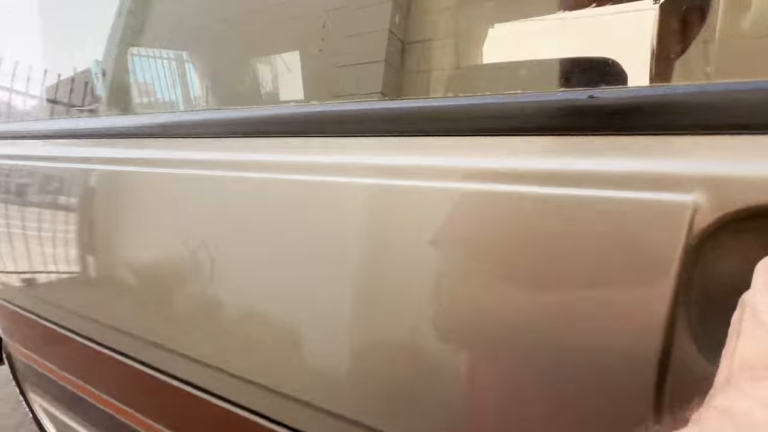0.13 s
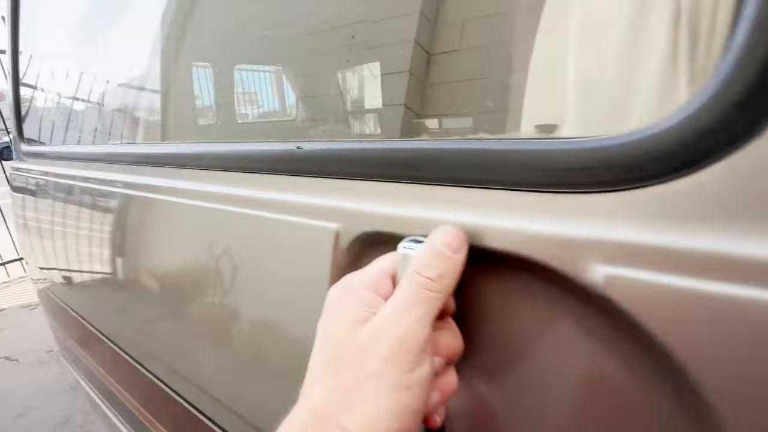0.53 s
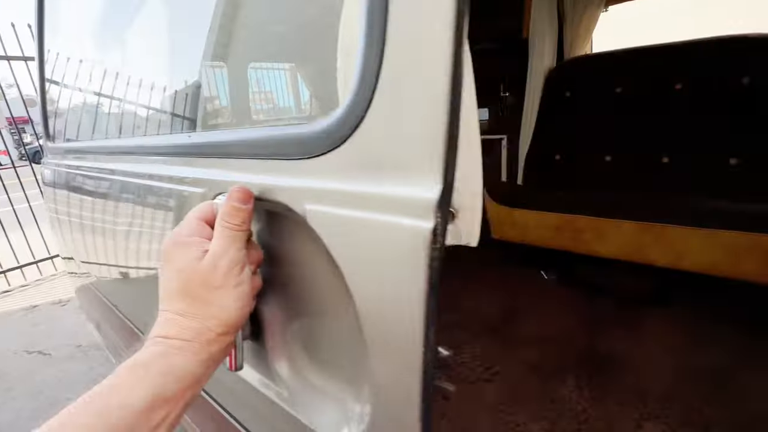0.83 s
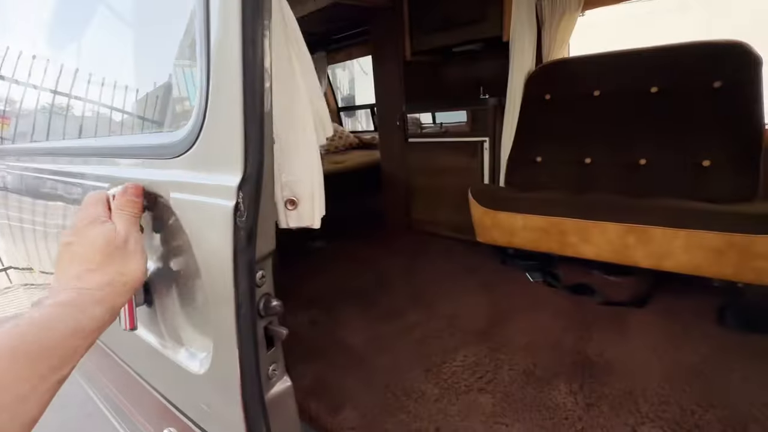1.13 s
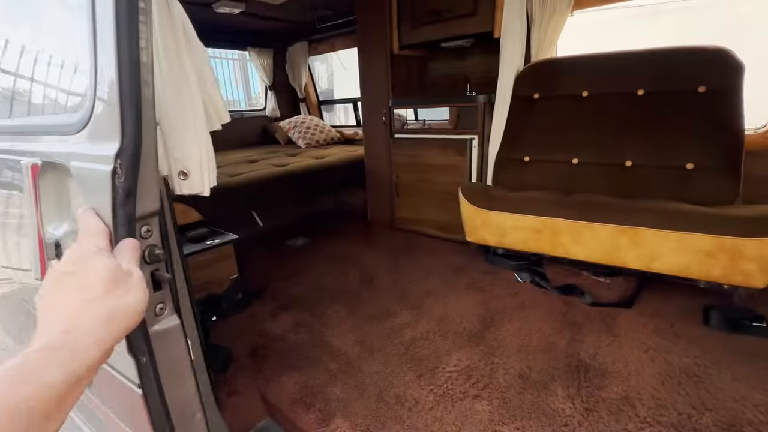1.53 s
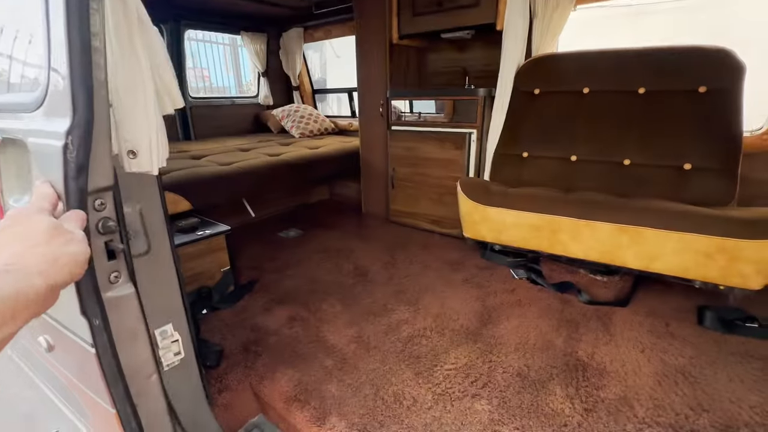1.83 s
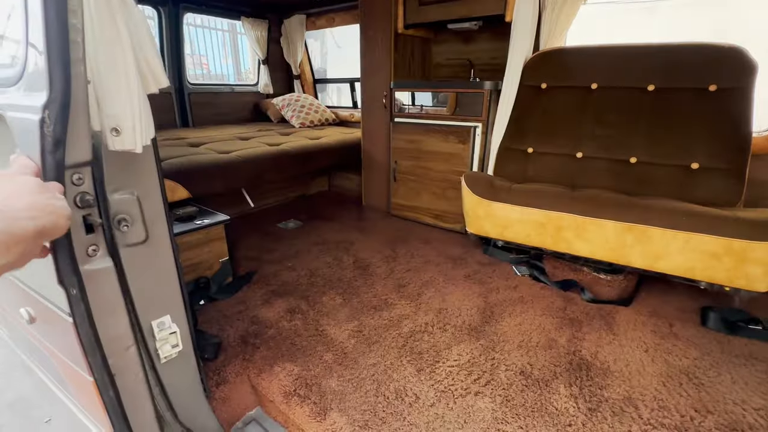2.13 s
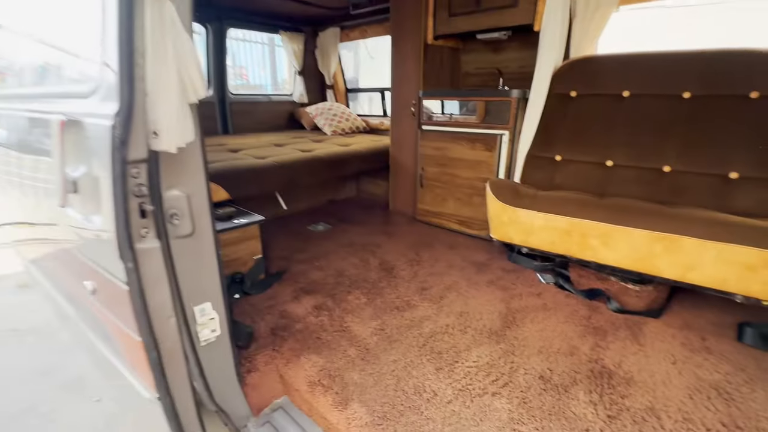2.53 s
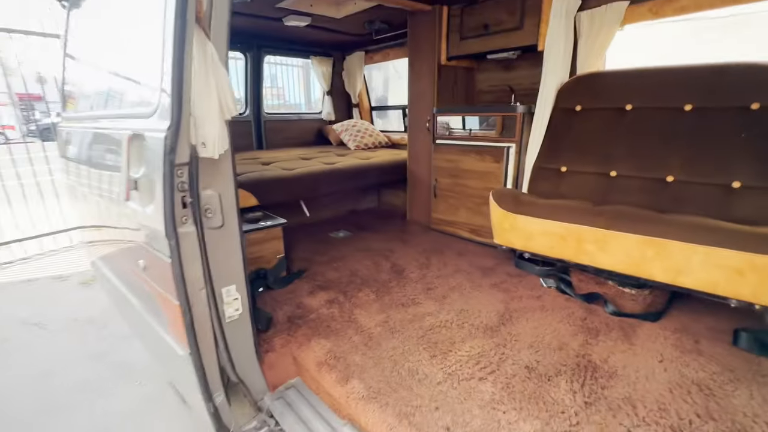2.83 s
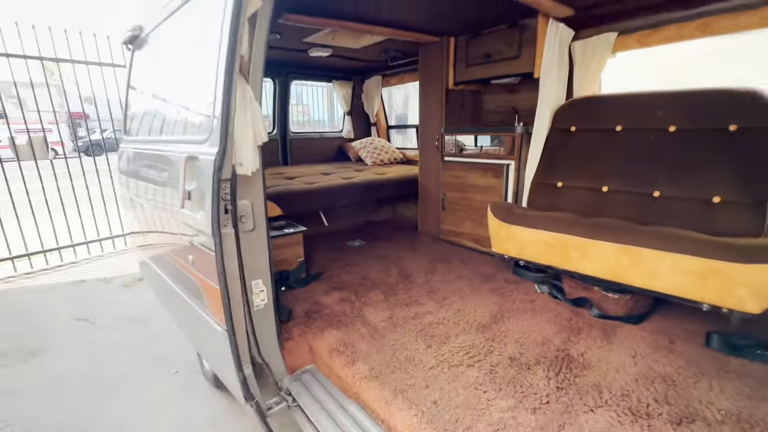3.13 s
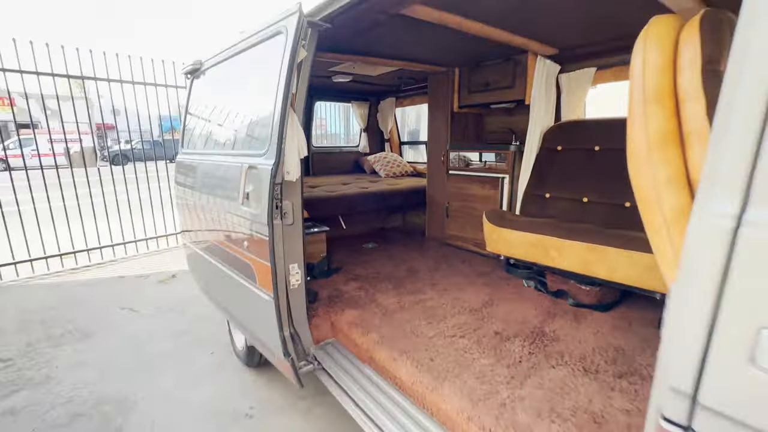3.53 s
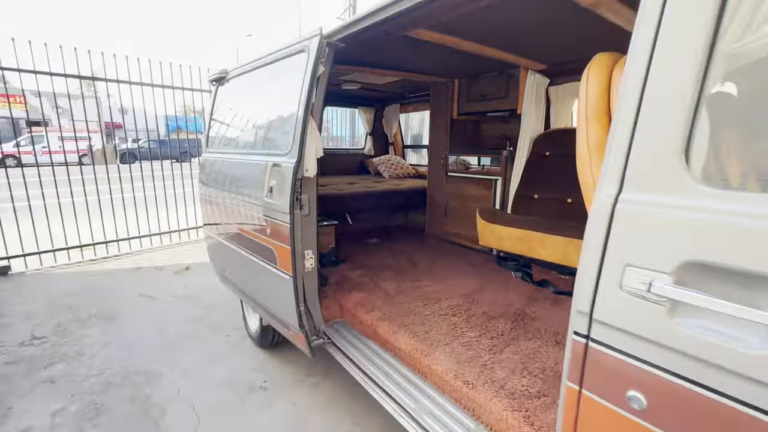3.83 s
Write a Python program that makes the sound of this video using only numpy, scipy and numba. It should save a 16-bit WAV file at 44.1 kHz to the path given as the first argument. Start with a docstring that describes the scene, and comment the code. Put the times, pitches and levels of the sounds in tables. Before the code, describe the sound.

A van's heavy sliding door clunks off its latch, rumbles along a gritty metal track with knocks and scrapes, then settles with a thin ring. Shoes and clothes scuff faintly afterwards, heard close by outdoors over distant traffic.

```python
"""A van's heavy side door clunks off its latch, rolls back along its metal track and slows to a stop.
Bumps under the rollers drum the door panel, brighter with speed; grit crunches, the rollers knock and
scrape, the latch rattles, and a thin metal ring lingers as the door settles.
Then shoes and clothes scuff as someone steps back. Dry ticks and distant traffic run through it all."""
import sys
import numpy as np
from scipy import signal
from scipy.fft import rfft, irfft
from scipy.io import wavfile
from scipy.ndimage import map_coordinates
from numba import njit

SR = 44100
rng = np.random.default_rng(int(sys.argv[2]) if len(sys.argv) > 2 else 0)


def unload_wav(signal):
    """Save mono or channel-first audio to the path in sys.argv[1] as 16-bit WAV at rate SR, clipped to [-1, 1]."""
    wavfile.write(
        sys.argv[1],
        SR,
        np.round(np.clip(np.atleast_2d(signal).T, -1, 1) * 32767).astype(np.int16),
    )


N = 176400
T = np.arange(N) / SR
F = np.maximum(np.arange(N + 1) * SR / (2 * N), 1)
MIC_LAG_S = 0.000467  # left microphone to right
GRIT_PER_S = 900


def undb(db):
    """Decibels to gain."""
    return 10 ** (np.asarray(db) / 20)


def unit(x):
    """Scale to rms 1."""
    return x / np.sqrt(np.mean(x ** 2))


def curve(rows, column=1):
    """One column of a table, joined by lines in time."""
    rows = np.array(rows)
    return np.interp(T, rows[:, 0], rows[:, column])


def over_hz(rows):
    """Points joined on a log-frequency axis."""
    rows = np.array(rows)
    return np.interp(np.log(F), np.log(rows[:, 0]), rows[:, 1])


def colour(rows):
    """Minimum-phase EQ through (freq_hz, gain_db) points."""
    cepstrum = irfft(np.log(undb(over_hz(rows))))
    cepstrum[1:N] *= 2
    cepstrum[N + 1:] = 0
    return np.exp(rfft(cepstrum))


def resonance(hz, width):
    """Response of one mode, gain 1 at its centre."""
    return 1 / (1 + 1j * (F / hz - hz / F) * hz / width)


def through(x, response):
    """Filter a sound."""
    return irfft(rfft(x, 2 * N) * response)[..., :N]


def walk(rate):
    """Smooth random drift, spread about 1, with `rate` new values a second."""
    return map_coordinates(rng.standard_normal(2048), [T * rate], order=3, mode='wrap')


def swell(peak_s, half_length_s):
    """Bell-shaped fade in and out."""
    return np.exp(-((T - peak_s) / half_length_s) ** 2 / 2)


def grains(per_s, spread_db):
    """Three unrelated streams of tiny impacts of uneven size."""
    hit = rng.random((3, N)) < per_s / SR
    size = undb(spread_db * np.minimum(rng.exponential(size=(3, N)), 4))
    return unit(hit * size * np.sign(rng.standard_normal((3, N))))


def stereo(x, response, lag_s=0.):
    """Filter three streams into stereo: one shared, lag_s later on the right, and one for each side."""
    # how alike the two microphones sound: freq_hz, shared_fraction
    likeness = [(60, 0.96), (180, 0.88), (360, 0.76), (600, 0.4), (1100, 0.37), (1900, 0.38), (5000, 0.03),
                (15000, 0.33)]
    share = over_hz(likeness)
    spectra = rfft(x, 2 * N) * response
    shared = spectra[0] * np.exp(-2j * np.pi * F * lag_s * np.array([[0], [1]]))
    return irfft(np.sqrt(share) * shared + np.sqrt(1 - share) * spectra[1:])[:, :N]


def ring_out(x, t60_s, wet):
    """Add a short, dense ring like that of sheet metal."""
    tail = rng.standard_normal((3, SR // 2)) * undb(-60 * T[:SR // 2] / t60_s)
    tail /= np.sqrt(np.sum(tail ** 2, axis=1, keepdims=True))
    return (x + wet * signal.fftconvolve(x, tail, axes=1)[:, :N]) / np.hypot(1, wet)


@njit
def lowpass(x, hz, damping):
    """Two-pole low-pass with a hump at its moving corner; less damping, more hump."""
    y, band_state, low_state = np.empty(len(x)), 0., 0.
    for i in range(len(x)):
        g = np.tan(np.pi * hz[i] / SR)
        band = (band_state + g * (x[i] - low_state)) / (1 + g * (g + damping))
        y[i] = low_state + g * band
        band_state, low_state = 2 * band - band_state, 2 * y[i] - low_state
    return y


def strikes(rows, vary_db, fittings=1):
    """Each blow is a quick chatter of contacts that rings steel and any fittings; vary_db recolours it."""
    # tone of struck steel: freq_hz, gain_db
    steel_eq = [(100, -13.5), (400, 0), (900, 11), (2000, 5), (3200, -4), (5000, -7), (7000, -17.5),
                (11000, -34), (16000, -46)]
    chatter = ring_out(grains(per_s=700, spread_db=1.1), t60_s=0.039, wet=3.0)
    size = 8192
    octaves = np.log2(np.clip(np.arange(size // 2 + 1) * SR / size, 500, 12000) / 1500)
    fade = 1 - T[:size] / T[size]
    force = np.zeros((3, N))
    for start_s, db, tilt, chatter_s in rows:
        i = int(start_s * SR)
        burst = chatter[:, i:i + size] * np.exp(-T[:size] / chatter_s)
        burst *= np.sqrt(chatter_s * SR / 2 / np.sum(burst ** 2, axis=1, keepdims=True))
        ripple = np.interp(octaves, np.arange(-12, 24) / 6, rng.standard_normal(36))
        tone = undb(tilt * octaves + vary_db * ripple)
        force[:, i:i + size] += undb(db) * irfft(rfft(burst) * tone) * fade
    body = colour(steel_eq) * fittings
    body /= np.sqrt(np.mean(abs(body) ** 2))
    return stereo(ring_out(force, t60_s=0.068, wet=0.63), body, MIC_LAG_S) * undb(3.5)


def swing_out(hold_s=0.032, deep_fall_s=0.25, panel_fall_s=0.057):
    """The door's mass shudders as it swings clear of its seal."""
    shake = rng.standard_normal((3, N))
    fading_s = np.maximum(T - hold_s, 0)
    deep = unit(stereo(shake, resonance(hz=48, width=45) ** 2)) * np.exp(-fading_s / deep_fall_s)
    panel = unit(stereo(shake, resonance(hz=132, width=117) ** 2)) * np.exp(-fading_s / panel_fall_s)
    return undb(-21) * (deep + undb(-1) * panel)


def rolling(full_speed_hz=619, jolt_fall_s=0.038, shift_db=5, lag_s=0.00014, drift_s_per_s=0.00012):
    """Bumps in the track shake the panel; the faster the door, the sharper the bumps."""
    # the door's run: time_s, fraction_of_full_speed, roller_load_db
    travel = [(0, 0.21, 7.5), (.2, 0.38, 3), (.29, 0.41, -2), (.33, 0.53, -1.5), (.52, 0.61, -1.5),
              (.76, 0.68, -2.5), (1.08, 0.89, -3.5), (1.4, 0.81, -6.5), (1.74, 0.76, -4), (1.82, 0.78, -10),
              (2.02, 0.7, -12.5), (2.13, 0.51, -14), (2.31, 0.75, -19), (2.42, 0.26, -21.5),
              (2.75, 0.12, -43)]
    # extra force as the rollers drop over a bump: start_s, boost_db
    jolts = [(0.309, 6.5), (1.237, 3.5), (1.539, 7.5), (2.012, 5.5), (2.319, 2.5)]
    # tone of the door body: freq_hz, gain_db
    body_eq = [(25, -34), (55, -15.5), (85, -2), (150, 1), (280, -3.5), (450, -2.5), (510, -2.5),
               (570, 1.5), (800, 1.5), (1050, -4), (1500, -2.5), (3000, -10), (8000, -38)]
    # door panel modes: pitch_hz, width_hz, gain_db
    panel_modes = [(121.7, 23.5, -3), (207, 21, -5.5), (241.3, 21, -6.5), (322, 28, -1.5), (394, 120, -1.5),
                   (588, 16, -6.5), (705, 27, -4), (867, 35, 0)]
    corner_hz = full_speed_hz * curve(travel)
    jolt_db = sum(db * (T >= s) * np.exp(-abs(T - s) / jolt_fall_s) for s, db in jolts)
    load = undb(curve(travel, column=2) + jolt_db)
    bumps = ring_out(grains(per_s=1400, spread_db=1.93), t60_s=0.06, wet=0.32)
    force = np.array([lowpass(stream, corner_hz, damping=1.) for stream in bumps]) * load
    push = stereo(force, colour(body_eq))
    panel = undb(-1.5) * push
    for hz, width, db in panel_modes:  # each mode swells and fades as the rollers move along
        panel += through(push * undb(db + shift_db * walk(6.76)), resonance(hz, width))
    # the door passes right to left: the left side hears it late at first, then early
    left = map_coordinates(panel[0], [(T - lag_s + drift_s_per_s * T) * SR], order=3, mode='nearest')
    return undb(-21) * unit(np.array([left, panel[1]]))


def grit():
    """Fine crunch of the rollers on the steel track, fading as the door runs on."""
    # grit under the rollers: time_s, level_db
    levels = [(0, -23.5), (.25, -27.5), (.4, -32), (.7, -32), (1.18, -29), (1.46, -32), (1.74, -35),
              (1.8, -43.5), (2.05, -46.5), (2.35, -48.5), (2.6, -88)]
    # tone of the steel track: freq_hz, gain_db
    track_eq = [(200, -61.5), (700, 10), (1300, 7.5), (2000, -5), (3000, -8.5), (4600, -15.5),
                (6500, -20.5), (10000, -26.5), (16000, -40.5)]
    crunch = ring_out(grains(GRIT_PER_S, spread_db=2.6), t60_s=0.061, wet=1.6)
    return unit(stereo(crunch, colour(track_eq), MIC_LAG_S)) * undb(curve(levels) + walk(25.18))


def outdoors():
    """A bed of distant traffic and a faint high hiss."""
    # traffic rumble: freq_hz, gain_db
    traffic_eq = [(20, -9), (60, 3), (85, 3.5), (130, -3.5), (250, -7), (500, -10.5), (650, -7), (950, -7),
                  (1800, -21), (2600, -29.5), (16000, -65.5)]
    # tone of the hiss: freq_hz, gain_db
    hiss_eq = [(1500, -8), (3500, 4.5), (6000, 8), (9500, 6), (12000, -0.5), (16000, -11)]
    # rise and fall of the hiss: time_s, level_db
    hiss_levels = [(0, -93), (1.8, -61.5), (2.6, -65), (2.85, -60.5), (3.15, -62), (3.33, -77), (3.48, -66),
                   (3.75, -61.5), (4, -59.5)]
    traffic = unit(stereo(rng.standard_normal((3, N)), colour(traffic_eq), lag_s=0.00043))
    hiss = unit(stereo(rng.standard_normal((3, N)), colour(hiss_eq), MIC_LAG_S))
    return traffic * undb(-40) + hiss * undb(curve(hiss_levels))


def latch():
    """The latch lets go and rattles, ringing with its own modes."""
    # latch clacks: start_s, level_db, tilt_db_per_octave, chatter_s
    clacks = [(0.042, -34.5, 11.5, 0.012), (.051, -17.5, 4.5, 0.0063), (0.062, -14.5, -3, 0.0087),
              (.068, -30, 12, 0.0035), (0.13, -20.5, 0.5, 0.012), (.293, -33, 2, 0.0073)]
    # latch modes: pitch_hz, width_hz, gain_db
    latch_modes = [(710, 16, 15.5), (1246, 120, 11), (1980, 240, -2.5), (2540, 25, 0), (4300, 1700, -1.5)]
    ringing = sum(undb(db) * resonance(hz, width) for hz, width, db in latch_modes)
    return strikes(clacks, vary_db=0, fittings=1 + ringing)


def panel_hum(waver_hz=6, flutter_db=3.5):
    """At some places along the track a low mode of the panel swells into a hum."""
    # panel hums: peak_s, pitch_hz, level_db, half_length_s
    hums = [(0.2, 205, -19, 0.06), (0.365, 210, -16, 0.031), (0.45, 300, -15, 0.018),
            (0.603, 200, -21, 0.087), (1.087, 207, -23.5, 0.031), (1.258, 555, -23.5, 0.014),
            (1.637, 565, -29, 0.049), (2.177, 125.2, -32.5, 0.21)]
    out = 0
    for peak_s, hz, db, half_length_s in hums:
        tone = np.sin(2 * np.pi * np.cumsum(hz + waver_hz * walk(24.65)) / SR)
        out += tone * undb(db + flutter_db * walk(12)) * swell(peak_s, half_length_s)
    return out


def roller_knocks():
    """The rollers strike a different spot of the track each time, so each knock has its own colour."""
    # roller blows: start_s, level_db, tilt_db_per_octave, chatter_s
    knocks = [(0.205, -30.5, 0, 0.015), (0.308, -27, -10, 0.0078), (0.611, -33, 2.5, 0.032),
              (.897, -41.5, 10, 0.0023), (.978, -19, -2, 0.0019), (1.092, -25.5, -5, 0.014),
              (1.233, -36.5, 1, 0.045), (1.364, -27.5, -4, 0.013), (1.538, -33, 0, 0.022),
              (1.692, -28.5, -2.5, 0.025), (2.011, -33.5, -4, 0.0096)]
    return strikes(knocks, vary_db=6)


def ticks(fall_s=0.0035):
    """Short dry ticks, each a burst of noise around its own pitch."""
    # small ticks: start_s, level_db, pitch_hz, width_hz
    hits = [(.212, -42, 13100, 6000), (.278, -41, 8900, 5650), (2.536, -43, 2600, 200),
            (3.085, -41.5, 3300, 1960), (3.135, -42.5, 3800, 2200), (3.428, -52, 13400, 4000),
            (3.615, -43.5, 4870, 6100), (3.766, -42.5, 3200, 1600), (3.847, -35.5, 12200, 3500),
            (3.97, -39.5, 5000, 6000)]
    out, size = np.zeros((3, N + SR)), 2048
    freqs = np.maximum(np.arange(size // 2 + 1) * SR / size, 1)
    for start_s, db, hz, width in hits:
        band = 1 / (1 + ((freqs - hz) * 2 / width) ** 2)
        burst = unit(irfft(rfft(rng.standard_normal((3, size))) * band))
        i = int(start_s * SR)
        out[:, i:i + size] += undb(db) * burst * np.exp(-T[:size] / fall_s)
    return stereo(ring_out(out[:, :N], t60_s=0.089, wet=0.45), response=1)


def scrapes():
    """A roller slips on the rail and rings its bracket."""
    # roller slips: peak_s, level_db, half_length_s
    slips = [(0.47, -37, 0.031), (0.625, -30.5, 0.017), (0.91, -40.5, 0.17)]
    # bracket modes: pitch_hz, width_hz, gain_db
    bracket_modes = [(2314, 860, 10), (4460, 450, -3)]
    envelope = sum(undb(db) * swell(peak_s, half_length_s) for peak_s, db, half_length_s in slips)
    bracket = sum(undb(db) * resonance(hz, width) ** 2.03 for hz, width, db in bracket_modes)
    return unit(stereo(grains(GRIT_PER_S, spread_db=1.8), bracket, MIC_LAG_S)) * envelope


def thin_ring(slide_hz=220, slide_s=0.02827, waver_hz=6.72, lag_s=0.00042):
    """Two close metal tones and a rough band slide up into pitch as the door slows, then die away."""
    # ringing metal: pitch_hz, width_hz, gain_db
    partials = [(1676, 9.95, 5.5), (1756, 7.4, 8.5), (1665, 69.4, 4.5)]
    # envelope of the ring: time_s, level_db
    levels = [(1.92, -52), (1.99, -28.5), (2.05, -42), (2.3, -43), (2.45, -48), (2.7, -54), (3.1, -68)]
    flat_hz = slide_hz * np.exp(-np.maximum(T - levels[0][0], 0) / slide_s)
    ring = 0
    for hz, width, db in partials:
        pitch_hz = hz - flat_hz + waver_hz * walk(14) + width * walk(90)
        tone = np.sin(2 * np.pi * np.cumsum(pitch_hz) / SR)
        rub = unit(through(rng.standard_normal(N), resonance(hz, 4 * width) ** 2))
        ring += undb(db) * (tone + rub)
    ring = unit(ring) * undb(curve(levels))
    return np.array([ring, np.interp(T - lag_s, T, ring)])


def scuffs(flutter_db=3.0, vary_db=0.5):
    """Gritty, uneven swishes of shoes and clothes, each with its own small resonances."""
    # shoe and cloth moves: peak_s, level_db, rise_s, fall_s
    moves = [(2.93, -47, 0.021, 0.041), (3.06, -55, 0.024, 0.018), (3.135, -54.5, 0.05, 0.028),
             (3.691, -44, 0.017, 0.014), (3.755, -52.5, 0.025, 0.022), (3.812, -49.5, 0.0089, 0.011),
             (3.85, -48.5, 0.0065, 0.024)]
    # tone of the scuffs: freq_hz, gain_db
    scuff_eq = [(800, -15), (2500, 8.5), (7000, 7), (15000, 2), (17000, -10)]
    friction = grains(per_s=550, spread_db=2.7) * undb(flutter_db * walk(110))
    crackle = unit(stereo(ring_out(friction, t60_s=0.051, wet=0.6), colour(scuff_eq)))
    out = 0
    for peak_s, db, rise_s, fall_s in moves:
        ripple = np.interp(F, np.linspace(0, SR / 2, 80), rng.standard_normal(80))
        envelope = undb(db) * np.exp(-np.maximum((peak_s - T) / rise_s, (T - peak_s) / fall_s))
        out += through(crackle * envelope, unit(undb(vary_db * ripple)))
    return out


def scene(left_lead_db=1.02):
    """The door, the person and the street, leaning slightly left."""
    door = rolling() + panel_hum() + swing_out() + grit() + scrapes()
    door += latch() + roller_knocks() + thin_ring()
    balance = undb(np.array([[left_lead_db], [-left_lead_db]]) / 2)
    return (door + scuffs() + ticks() + outdoors()) * balance


def record(dry, top_hz=15800):
    """The microphone ports notch the treble; the top is cut."""
    # port notches: freq_hz, width_hz, depth_fraction
    notches = [(5040, 180, 0.8), (7500, 620, 0.6)]
    for hz, width, depth in notches:
        dry = through(dry, 1 - depth * resonance(hz, width))
    return signal.sosfilt(signal.ellip(10, .2, 80, top_hz, fs=SR, output='sos'), dry)


dry = scene()
out = record(dry)
unload_wav(out)
```